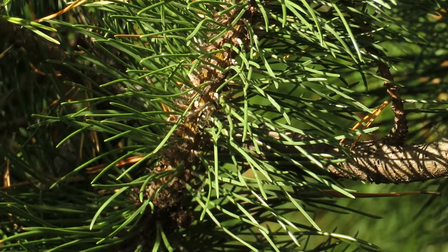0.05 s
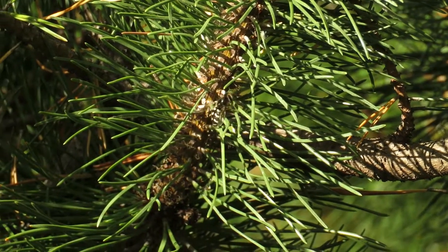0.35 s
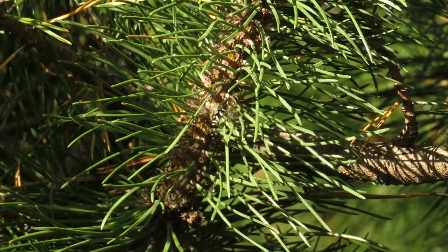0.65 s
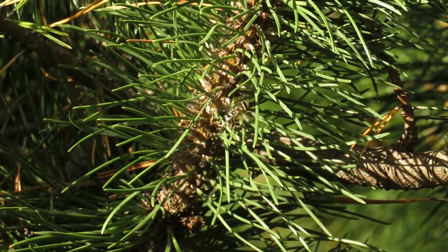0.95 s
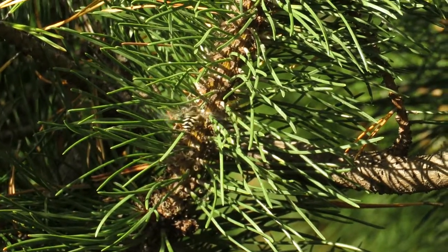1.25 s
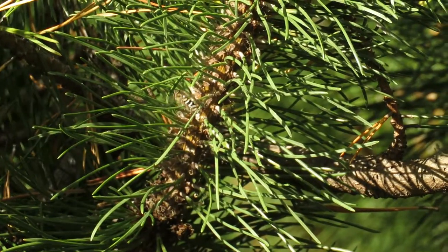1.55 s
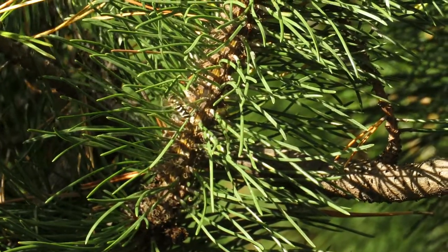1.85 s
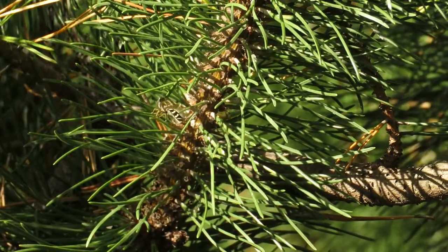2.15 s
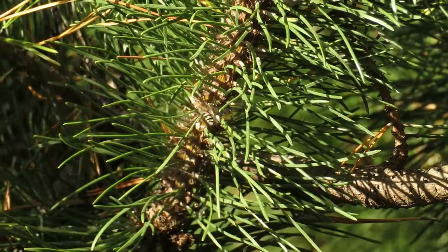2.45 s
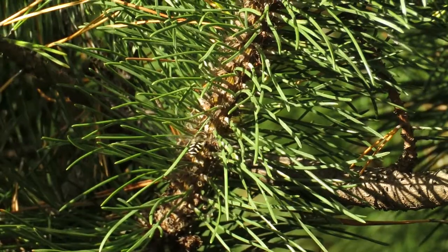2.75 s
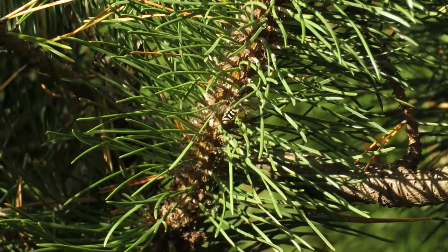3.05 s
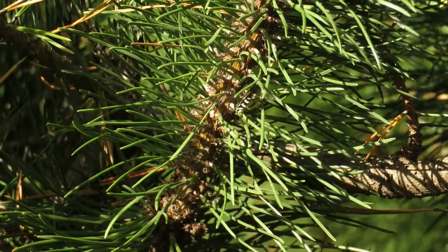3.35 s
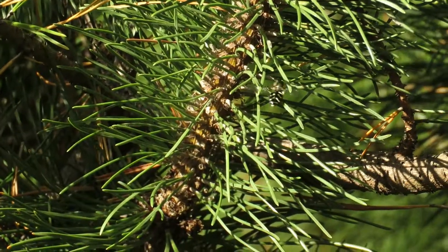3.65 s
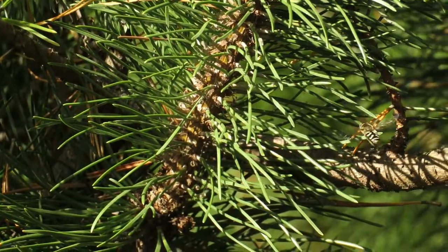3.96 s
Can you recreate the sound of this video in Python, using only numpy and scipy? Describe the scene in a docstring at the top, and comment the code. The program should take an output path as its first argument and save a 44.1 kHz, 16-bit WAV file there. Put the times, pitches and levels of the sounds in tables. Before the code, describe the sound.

Wind makes a low, even rush outdoors by a pine tree, much like far traffic. A faint hollow moan swells early on. Soft low bumps touch the microphone and then build into rumbling, fluttering gusts.

```python
"""A steady low rush of distant traffic or wind among pines, holding a sinking drone, two faint whines
and a brief hollow moan. A breeze reaches the microphone, first in soft bumps, then in gusts whose
eddies buffet its two ports in nearly opposite phase. The hardest buffets make the limiter duck the rush."""
import sys
import numpy as np
from scipy import signal
from scipy.fft import rfft, irfft
from scipy.io import wavfile
from scipy.ndimage import uniform_filter1d

SR = 44100
rng = np.random.default_rng(int(sys.argv[2]) if len(sys.argv) > 2 else 0)


def dump(signal):
    """Clip the signal to [-1, 1] and save it as 16-bit WAV at the path in sys.argv[1]."""
    limited = np.clip(np.atleast_2d(signal).T, -1, 1)
    pcm = np.round(limited * 32767).astype(np.int16)
    wavfile.write(sys.argv[1], SR, pcm)


N = 176400
HOP = 256
TIME_S = np.arange(N) / SR
FRAMES_S = np.arange(N // HOP + 5) * HOP / SR
BINS_HZ = np.fft.rfftfreq(4 * HOP, 1 / SR)


def amp(db):
    """Decibels to gain."""
    return 10 ** (np.asarray(db) / 20)


def unit(x):
    """Scales to rms 1."""
    return x / np.sqrt(np.mean(x ** 2) + 1e-20)


def by_hz(table):
    """Reads a table at every bin, on a log frequency axis."""
    hz, value = np.transpose(table)
    return np.interp(np.log(BINS_HZ + 1), np.log(hz + 1), value)


def drift(rate_hz):
    """Smooth random motion, rms 1."""
    hz = np.fft.rfftfreq(N, 1 / SR)
    return unit(irfft(rfft(rng.standard_normal(N)) * np.exp(-(hz / rate_hz) ** 2), N))


def patches(frames, bins):
    """Random patches in time and frequency, rms 1."""
    noise = rng.standard_normal((len(FRAMES_S), len(BINS_HZ)))
    return unit(uniform_filter1d(uniform_filter1d(noise, frames, axis=0), bins, axis=1))


def stereo_noise(colour_db, likeness):
    """Noise of a given colour and left-right correlation, rms 1."""
    a, b, c, d = rng.standard_normal((4, len(FRAMES_S), len(BINS_HZ)))
    correlation = np.clip(by_hz(likeness), -.995, .995)
    mid = np.sqrt(1 + correlation) * (a + 1j * b)
    side = np.sqrt(1 - correlation) * (c + 1j * d)
    spectra = np.array([mid + side, mid - side]) * amp(colour_db)
    _, noise = signal.istft(spectra, nperseg=4 * HOP, noverlap=3 * HOP, time_axis=1, freq_axis=2)
    return unit(noise[:, :N])


# Rush spectrum: freq_hz, relative_db
RUSH_SPECTRUM = [(20, -39), (50, -20), (80, -12.5), (125, -3), (160, -4), (195, -2), (260, -3.5), (315, -4),
                 (360, -10.5), (415, -2.5), (490, -13), (530, -8.5), (650, -9), (760, -15.5), (860, -16),
                 (1100, -16), (1400, -21.5), (1870, -25), (2250, -30.5), (3500, -37), (5900, -44.5),
                 (9000, -50), (12400, -52), (14500, -58.5)]
# Left-right likeness of the rush: freq_hz, correlation
RUSH_LIKENESS = [(60, 0.9), (110, 1), (200, 0.95), (250, 0.95), (380, 0.8), (600, 0.86), (1100, 0.85),
                 (1800, 0.81), (2700, 0.59), (4100, 0.46), (6200, 0.23), (14000, 0.27)]
# Swell of its low-mid roar: time_s, gain_db
ROAR_SWELL = [(0, -1.5), (.47, -2), (.65, 4), (.88, 3.4), (1.05, 0), (1.25, 2.5), (1.57, 1), (2.0, 0.5),
              (3.2, -2), (4, -0.5)]


def rush(level_db=-35, roar_hz=420, needles_hz=2960, rustle_hz=7000, rustle_s=2.85, rustle_width_s=.05):
    """Far noise whose roar swells and settles; pine needles hiss on top and rustle once."""
    roar_db = np.interp(FRAMES_S, *np.transpose(ROAR_SWELL))
    stir_db = -0.27 * np.interp(FRAMES_S, TIME_S, drift(rate_hz=5.9))
    rustle_db = 3.5 * np.exp(-((FRAMES_S - rustle_s) / rustle_width_s) ** 2)
    colour_db = by_hz(RUSH_SPECTRUM) + 1.19 * patches(frames=14, bins=8)
    colour_db += np.outer(roar_db, np.exp(-np.log2((BINS_HZ + 1) / roar_hz) ** 2))
    colour_db += np.outer(stir_db, BINS_HZ / (BINS_HZ + needles_hz))
    colour_db += np.outer(rustle_db, BINS_HZ ** 2 / (BINS_HZ ** 2 + rustle_hz ** 2))
    return stereo_noise(colour_db, RUSH_LIKENESS) * amp(level_db + 0.58 * drift(rate_hz=40))


# Low sinking drone: time_s, pitch_hz, level_db
DRONE_CURVE = [(0, 300, -49), (.35, 280.4, -40), (.55, 265, -44), (.95, 249.9, -39), (1.3, 252, -47),
               (1.6, 235, -46), (2.3, 226.2, -54), (2.7, 248.8, -41), (4, 240, -50)]
# Hollow moan that swells with the roar: time_s, pitch_hz, level_db
MOAN_CURVE = [(.5, 490, -65), (.84, 488, -38), (1.0, 484, -45), (1.2, 487.4, -51), (4, 488.6, -56)]


def resonance(curve, width_hz):
    """A drone or moan: narrow-band noise following a curve of pitch and level."""
    time_s, pitch_hz, level_db = np.transpose(curve)
    phase = 2 * np.pi * np.cumsum(np.interp(TIME_S, time_s, pitch_hz)) / SR
    band = unit(drift(width_hz) * np.cos(phase) + drift(width_hz) * np.sin(phase))
    return band * amp(np.interp(TIME_S, time_s, level_db))


# Far whines: pitch_hz, level_db
WHINE_TONES = [(824, -59.5), (1081.5, -62)]


def whines(waver_hz=2.67, fade_db=2):
    """Thin far tones that waver and fade in the moving air."""
    out = np.zeros(N)
    for pitch_hz, level_db in WHINE_TONES:
        phase = 2 * np.pi * np.cumsum(pitch_hz + waver_hz * drift(rate_hz=6.5)) / SR
        fading = amp(fade_db * drift(rate_hz=8.7))
        out += amp(level_db) * unit(np.sin(phase) * fading)
    return out


# Breeze at the microphone: time_s, strength_db
GUST_STRENGTH = [(0, -77), (.76, -68), (.87, -38.5), (.97, -51), (1.05, -67), (1.5, -58), (1.69, -46),
                 (1.76, -58.5), (2.26, -48), (2.32, -41), (2.6, -38.5), (2.75, -49.5), (2.9, -39),
                 (3.11, -30.5), (3.18, -47.5), (3.39, -38), (3.46, -25.5), (3.85, -31), (4, -25)]
# Left-right likeness of the wind at the ports: freq_hz, correlation
PORT_LIKENESS = [(25, -0.8), (50, 0.78), (85, 0.13), (140, -0.57), (250, -0.94), (500, -0.96)]
# Soft push shared by both ports: freq_hz, relative_db
PUSH_SPECTRUM = [(20, -27), (40, -3), (60, 10), (90, -3.5), (150, -17.5), (300, -27), (700, -75)]
# Wind rumble: freq_hz, relative_db
RUMBLE_SPECTRUM = [(20, -30), (45, -10.5), (70, -0.5), (110, 3), (160, 3), (240, -15), (350, -21),
                   (520, -39), (1000, -79)]
# Flutter in strong gusts: freq_hz, relative_db
FLUTTER_SPECTRUM = [(80, -13), (160, 1.5), (240, 8), (340, -12), (480, -16), (570, -28), (900, -42),
                    (2000, -77)]


def breeze(strong_gust_db=-26):
    """Lumpy turbulence at the ports; stronger gusts reach higher in pitch."""
    strength_db = np.interp(TIME_S, *np.transpose(GUST_STRENGTH)) - strong_gust_db
    lumps = drift(rate_hz=10)
    push_db = -30.5 + 0.56 * strength_db
    rumble_db = -22 + strength_db + 2 * lumps
    flutter_db = -29.5 + 2.1 * strength_db + 5.5 * lumps
    push = stereo_noise(by_hz(PUSH_SPECTRUM), PORT_LIKENESS)[0] * amp(push_db)
    rumble = stereo_noise(by_hz(RUMBLE_SPECTRUM), PORT_LIKENESS) * amp(rumble_db)
    flutter = stereo_noise(by_hz(FLUTTER_SPECTRUM), PORT_LIKENESS) * amp(flutter_db)
    return push + rumble + flutter


# Eddies hitting the microphone: peak_s, strength_db, pitch_hz, fall_s
EDDIES = [(.865, -35, 85, 0.0054), (0.956, -21, 85.3, 0.0043), (1.69, -29, 105, 0.004),
          (2.305, -22, 94.7, 0.0048), (2.355, -22.5, 100.2, .005), (2.428, -15, 112.6, 0.0056),
          (2.928, -18, 74.1, .006), (2.951, -15, 110, 0.0042), (2.975, -17, 68, .007),
          (3.013, -16, 115, 0.0037), (3.027, -15.5, 65, 0.0052), (3.059, -9, 184, 0.0032),
          (3.084, -4.5, 235, 0.0023), (3.1, -6.5, 140, 0.0035), (3.132, -14, 215.6, 0.003),
          (3.354, -17, 165, 0.0022), (3.408, -17.5, 231.6, 0.0025), (3.435, -13, 147.6, 0.0036),
          (3.465, -8.5, 191, 0.0031), (3.487, -2, 287, 0.0045), (3.524, -2, 270, 0.0041),
          (3.592, -4, 135.2, .0065), (3.623, -7.5, 254.3, 0.0043), (3.64, -6.5, 140.6, 0.0052),
          (3.678, -12, 192, 0.0027), (3.709, -11, 206.4, 0.0028), (3.742, -7, 159.1, 0.0035),
          (3.782, -10, 183, 0.0028), (3.907, -7.5, 178, 0.0042), (3.944, -11, 193, .003),
          (3.96, -6, 169.4, 0.005), (3.99, 0.5, 206, .002)]
# Burst above a hard eddy's thump: freq_hz, relative_db
BURST_SPECTRUM = [(120, -14), (300, -1), (470, -2.5), (580, -31), (1200, -50), (2500, -81)]


def buffets(wobble=0.1584, rise_share=0.75, max_lag_rad=2.654, opposite_hz=113):
    """Eddies thump, the higher the more opposite in the two ports; hard ones add a burst of flutter."""
    out = np.zeros((2, N))
    clock_s = np.cumsum(1 + wobble * drift(rate_hz=113.4)) / SR
    flutter = stereo_noise(by_hz(BURST_SPECTRUM), PORT_LIKENESS)
    for peak_s, strength_db, pitch_hz, fall_s in EDDIES:
        near = abs(TIME_S - peak_s) < .05
        t = TIME_S[near] - peak_s
        envelope = 1 / np.cosh(t / np.where(t < 0, rise_share * fall_s, fall_s))
        phase = 2 * np.pi * (pitch_hz * clock_s[near] + rng.random())
        lag_rad = max_lag_rad * np.tanh(pitch_hz / opposite_hz)
        thump = amp(strength_db - 1.5) * np.cos([phase, phase + lag_rad])
        burst = amp(1.6 * strength_db - 11) * flutter[:, near]
        out[:, near] += envelope * (thump + burst)
    return out


def scene():
    """The far rush with its drone, moan and whines, and the near wind on top."""
    far = rush() + resonance(DRONE_CURVE, width_hz=28) + resonance(MOAN_CURVE, width_hz=20) + whines()
    return far + breeze() + buffets()


def record(dry):
    """Low cut, a limiter that ducks quickly and recovers slowly, then a high cut."""
    low_cut_hz, high_cut_hz = 41.7, 14700
    threshold_db, duck_share, recover_db_per_s = -13, 0.54, 9
    x = signal.sosfilt(signal.butter(2, low_cut_hz, "high", fs=SR, output="sos"), dry)
    power_db = 10 * np.log10(abs(uniform_filter1d((x ** 2).mean(0), size=600)) + 1e-12)
    target_db = duck_share * np.maximum(power_db - threshold_db, 0)
    recovery_db = recover_db_per_s * TIME_S
    held_db = np.maximum.accumulate(target_db + recovery_db) - recovery_db
    duck_db = signal.lfilter([.004], [1, -.996], held_db)  # attack about 6 ms
    high_cut = signal.firwin(127, high_cut_hz, window=("kaiser", 7), fs=SR)
    return signal.filtfilt(high_cut, 1, x * amp(-duck_db))


dry = scene()
out = record(dry)
dump(out)
```